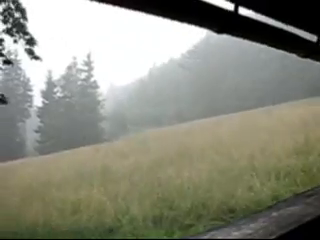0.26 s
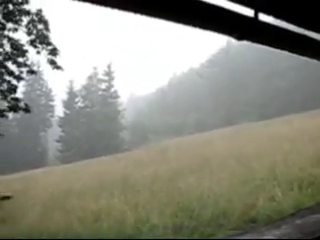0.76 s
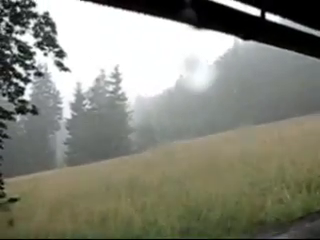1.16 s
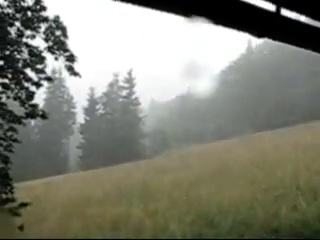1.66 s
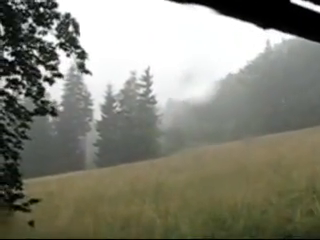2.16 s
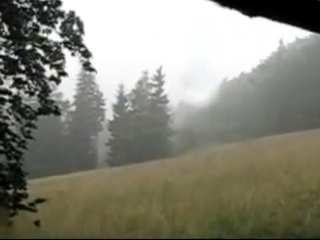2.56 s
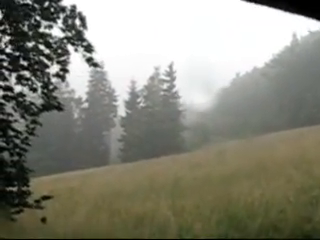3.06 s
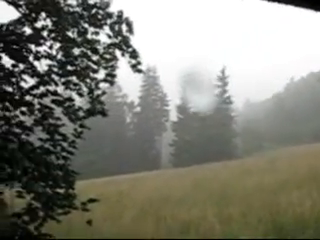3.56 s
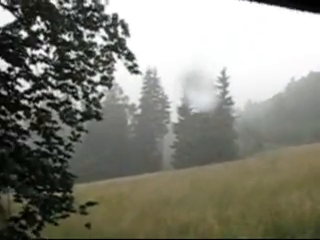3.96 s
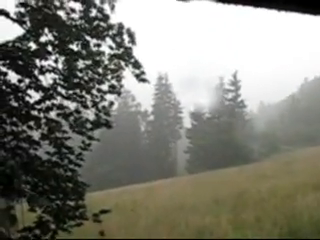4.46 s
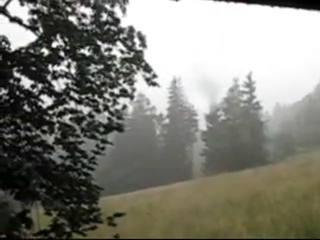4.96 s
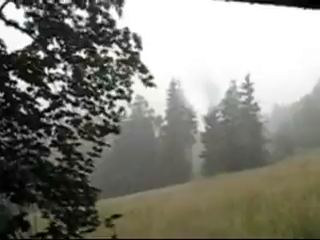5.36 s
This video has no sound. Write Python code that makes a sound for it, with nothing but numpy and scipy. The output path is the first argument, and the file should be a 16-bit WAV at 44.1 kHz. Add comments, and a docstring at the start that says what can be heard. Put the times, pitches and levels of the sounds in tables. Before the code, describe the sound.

Under the eaves in a downpour: a constant broad rain roar, close pattering, soft plops and occasional crisp clicking splashes.

```python
"""Heavy rain on a meadow and on the roof of a wooden shelter, heard from under the eaves.
Countless far drops merge into a roar, made of noise bands that swell together and flicker alone.
Nearer drops patter as short ringing tones; close ones click, chirp and spray, or plop into puddles.
The rain is centred except in the upper mids; its top ends sharply and a faint wide hiss lies above."""
import sys
import numpy as np
from scipy import signal
from scipy.fft import rfft, irfft
from scipy.io import wavfile
from scipy.ndimage import uniform_filter1d

SR = 44100
rng = np.random.default_rng(int(sys.argv[2]) if len(sys.argv) > 2 else 0)


def output_pcm(signal):
    """Save a mono or channel-first signal as 16-bit PCM at the path in sys.argv[1].

    Samples are clipped to [-1, 1] before scaling.
    """
    pcm = np.clip(np.atleast_2d(signal).T, -1, 1) * 32767
    wavfile.write(sys.argv[1], SR, np.round(pcm).astype(np.int16))


N = 246959  # length in samples

# tone colour of the centred rain: (f/Hz, relative level per Hz/dB)
RAIN_COLOUR = [(25, -22), (45, -19), (65, -8), (122, -13), (189, -9), (225, -14.5), (324, -4.5),
               (502, -5.5), (1020, -2), (1540, -3), (2200, -5), (2980, -7), (4620, -8.5), (6500, -13.5),
               (8500, -14.5), (9500, 13)]
# the level dips, mostly just after a sharp close drop; a minus sign means a gain:
# (t/s, level loss aimed at/dB, extra treble loss aimed at/dB)
LEVEL_DIPS = [(0.0, 3, 11), (2.57, 4.5, -0.5), (2.712, 4, -1), (2.722, -2.2, 9), (2.762, 1, 28),
              (4.978, 2.5, 0)]
RAIN_TOP_HZ = 8560  # the centred rain ends sharply here


def from_db(db):
    """Turn decibels into a gain."""
    return 10 ** (np.asarray(db) / 20)


def rms_one(x):
    """Scale a sound to an average (rms) strength of 1."""
    return x / np.sqrt(np.mean(x ** 2) + 1e-20)


def at_hz(points, hz):
    """Read a tone colour between its points, along a logarithmic pitch axis."""
    points = np.array(points)
    return np.interp(np.log(hz), np.log(points[:, 0]), points[:, 1])


def drift(rate_hz):
    """Slow chance wandering with spread 1: coarse noise smoothed twice by a one-pole low-pass."""
    step = 40  # samples between coarse noise values
    r = np.exp(-2 * np.pi * rate_hz * step / SR)
    noise = rng.standard_normal(N // step + 2002)
    slow = signal.lfilter([1], [1, -2 * r, r * r], noise)[2000:]  # skip the filter's start
    return np.interp(np.arange(N) / step, np.arange(len(slow)), rms_one(slow - slow.mean()))


def bandpass(x, low_hz, high_hz, order):
    """Keep the part of a sound between two frequencies."""
    return signal.sosfilt(signal.butter(order, [low_hz, high_hz], "band", fs=SR, output="sos"), x)


def steep(x, hz, kind):
    """Cut a sound off with a very sharp filter edge."""
    return signal.sosfilt(signal.ellip(12, .3, 70, hz, kind, fs=SR, output="sos"), x)


def ring(clicks, hz, t60):
    """Each unit click starts a sine of about height 1 that fades by 60 dB in t60 seconds."""
    r = from_db(-60 / (t60 * SR))
    w = 2 * np.pi * hz / SR
    return signal.lfilter([0, np.sin(w)], [1, -2 * r * np.cos(w), r * r], clicks + 1e-18)


def hiss():
    """Faint hiss above the rain: separate noise in each channel, plus a thin noise band near the top."""
    # colour of the broad hiss: (f/Hz, relative level per Hz/dB)
    hiss_colour = [(7000, -64), (8500, -13), (9800, 4), (11000, 6), (16000, 6.5)]
    broad_db, thin_db = -46, -52
    thin_hz, thin_width_hz = 15630, 230
    white = rng.standard_normal((2, 2, N))
    hz = np.maximum(np.arange(N // 2 + 1) * SR / N, 1)
    broad = irfft(rfft(white[0]) * from_db(at_hz(hiss_colour, hz)), N)
    thin = bandpass(white[1], thin_hz - thin_width_hz / 2, thin_hz + thin_width_hz / 2, 4)
    both = from_db(broad_db) * rms_one(broad) + from_db(thin_db) * rms_one(thin)
    return both * from_db([[-.4], [.4]])  # slightly louder on the right


def plops():
    """Fat eaves drops plop into puddles: a trapped bubble's tone swells softly, roughened by spray."""
    # (t/s, height of the tone's swell/dB, f/Hz)
    puddle_drops = [(0.445, -18.5, 1078), (0.926, -27, 2030), (1.068, -21, 737), (1.3, -26, 960),
                    (1.6, -22, 1670), (1.66, -21, 1615), (1.668, -23, 1056), (1.724, -24, 1950),
                    (1.765, -23, 1335), (1.845, -25, 1270), (2.135, -22, 1564), (2.141, -23.5, 1960),
                    (2.277, -21, 1936), (2.042, -28, 1125), (2.13, -23, 1260), (2.29, -20.5, 1487),
                    (2.368, -25, 1500), (2.412, -21, 2260), (2.912, -33, 2880), (3.176, -18.5, 1000),
                    (3.265, -21, 1470), (3.363, -19, 1630), (3.608, -20, 1273), (3.698, -20.5, 1505),
                    (3.711, -23.5, 2710), (3.76, -20, 1530), (3.96, -20, 1504), (4.279, -23, 1360),
                    (4.507, -21, 1690), (4.607, -18.5, 1410), (4.769, -23, 1340), (5.412, -22, 996)]
    swell_s = 0.0073  # time to the loudest point
    out, t = np.zeros(N), np.arange(2048) / SR
    shape = t / swell_s * np.exp(1 - t / swell_s)
    spray = rng.standard_normal((len(puddle_drops), len(t)))
    for (s, peak_db, hz), noise in zip(puddle_drops, spray):
        wet = rms_one(ring(noise, hz, 0.0069))
        at = round(s * SR)
        out[at:at + len(t)] += from_db(peak_db) * shape * (np.sin(2 * np.pi * hz * t) + 0.5 * wet)
    return out


def splashes():
    """Each close drop clicks, chirps upward and bursts into spray in a band set by what it hits."""
    # (t/s, peak before the final filters/dB, low edge f/Hz, high edge f/Hz, length/s)
    close_drops = [(0.287, -12, 3600, 5000, 0.0049), (0.353, -14, 4170, 5170, 0.0041),
                   (1.564, -15, 6500, 8500, 0.0044), (1.583, -15.5, 6960, 8500, .004),
                   (1.726, -15, 5060, 8700, 0.011), (1.922, -13, 4200, 5400, 0.0082),
                   (1.943, -15, 5700, 6800, 0.0039), (2.563, -23, 8260, 8900, 0.0045),
                   (2.6612, -11, 4300, 5650, .003), (2.7074, -5.5, 3900, 8700, 0.0032),
                   (2.756, -25, 6450, 8800, 0.0046), (4.076, -16, 6500, 8600, 0.0042),
                   (4.245, -14, 4200, 5400, 0.0037), (4.883, -14, 3780, 5200, 0.004),
                   (4.9707, -6, 4300, 7800, 0.0032), (5.128, -16, 6370, 8400, 0.0052)]
    click_share, chirp_share = 0.7, 1.2  # compared with the spray
    out, t = np.zeros(N), np.arange(1024) / SR
    spray = rng.standard_normal((len(close_drops), len(t)))
    for (s, peak_db, low_hz, high_hz, length), noise in zip(close_drops, spray):
        shape = t / length * np.exp(-4 * t / length)
        click = t == t[round(length * SR / 4)]  # at the loudest point of the shape
        rise = np.minimum(1.47 * t / length, 1) ** 2
        chirp = np.sin(2 * np.pi * np.cumsum(low_hz + (high_hz - low_hz) * rise) / SR)
        drop = click_share * click + shape * (np.sign(noise) + chirp_share * chirp)
        burst = bandpass(drop, low_hz, high_hz, 2)
        at = round(s * SR)
        out[at:at + len(t)] += from_db(peak_db) * burst / np.abs(burst).max()
    return out


def patter(bright_db):
    """Nearer drops of uneven size; each rings for a moment on a leaf, blade or board."""
    usual_drops_per_s = 900
    sizes = from_db(1.56 * np.minimum(rng.exponential(1, N), 5)) * rng.choice([-1, 1], N)
    landed = rng.random(N) < usual_drops_per_s * from_db(3 * drift(6.0)) / SR
    pitches = np.geomspace(700, 7500, 16)
    dealt = rng.integers(0, 16, N)  # which pitch a drop gets
    out = 0
    for k, hz in enumerate(pitches):
        colour_db = at_hz(RAIN_COLOUR, hz) + (hz / RAIN_TOP_HZ) ** 0.74 * bright_db
        tones = ring(sizes * landed * (dealt == k), hz, 21.3 / hz)  # higher rings are shorter
        out = out + from_db(colour_db) * hz * tones
    return rms_one(out)


def dips(lost_db, recovers_s):
    """Decibels lost over time: each dip sets in within milliseconds and fades out exponentially."""
    fall_s = 0.0073
    since = np.maximum(np.arange(N) / SR - np.array(LEVEL_DIPS)[:, :1], 0)
    return lost_db @ ((1 - np.exp(-since / fall_s)) * np.exp(-since / recovers_s))


def wide_band(dip_db, gust_db):
    """Rain that differs left to right, made of noise bands; below a wandering lower edge the bands come and go
    in patches."""
    # colour of this rain: (f/Hz, relative level per Hz/dB)
    wide_colour = [(430, -10), (800, -18), (1100, 0), (1500, -2), (2100, 2), (2600, 1.5), (3200, -0.5)]
    wide_db, top_hz = -6, 3190
    edge_hz, ragged_octaves = 1054, 0.3  # lower edge and how far chance moves it
    edge_rise_octaves = 0.12  # per dB of dip
    out, white = 0, rng.standard_normal((2, N))
    edges = 420 * 2 ** np.arange(0, 3.1, 1 / 4)  # quarter octaves
    wander = drift(5.2)  # shared by all bands
    for k, (low, high) in enumerate(zip(edges, edges[1:])):
        band = bandpass(white[k % 2], low, high, 4)
        hz = np.sqrt(low * high)
        above = np.log2(hz / edge_hz) - edge_rise_octaves * dip_db
        reach = above / ragged_octaves + 0.3 * wander + drift(8.1)
        opening = 1 / (1 + np.exp(-6 * reach))  # 0 is silent, 1 is fully heard
        out = out + band * from_db(at_hz(wide_colour, hz) + gust_db) * opening
    return steep(from_db(wide_db) * rms_one(out), top_hz, "low")


def roar(spectrum, bright_db, deep_db, gust_db, flicker_db):
    """Far drops too dense to count: noise bands that swell together and flicker alone."""
    # the deepest rumble stops for a moment: (middle t/s, length/s, upper limit f/Hz)
    rumble_breaks = [(0.768, 0.066, 149), (1.262, 0.042, 100), (2.1, .08, 90), (2.623, 0.058, 150),
                     (3.008, 0.11, 149), (3.23, 0.088, 130), (4.3, .08, 110), (4.657, 0.08, 130),
                     (5.04, .08, 110), (5.426, .1, 130)]
    break_db = 20
    gap_db, gap_hz = 56, 130  # the rumble also breaks off in patches: greatest loss, reach in pitch
    dulled_flicker_share = 0.78  # treble bands flicker more while dulled or brightened
    treble_ceiling_db = 2.5  # highest lift from brightness and flicker
    fine_from_hz = 4000  # bands are narrower from here up
    out, white = 0, rng.standard_normal((2, N))
    lull = drift(4.7)  # shared by all the rumble
    coarse_edges = np.geomspace(25, fine_from_hz, 22)
    edges = np.r_[coarse_edges, np.geomspace(fine_from_hz, 8800, 11)[1:]]
    middle_s, length_s, top_hz = np.transpose(rumble_breaks)
    from_middle = np.arange(0, N, 64) / SR - middle_s[:, None]  # worked out every 64 samples
    broken = np.exp(-(2 * from_middle / length_s[:, None]) ** 4)
    for k, (low, high) in enumerate(zip(edges, edges[1:])):
        band = bandpass(white[k % 2], low, high, 3)
        hz = np.sqrt(low * high)
        treble = (hz / RAIN_TOP_HZ) ** 5.3  # the dulling is strongest near the top
        bass = 1 / (1 + (hz / 400) ** 2)  # drumming on the roof swells on its own
        colour_db = at_hz(spectrum, hz) + bass * deep_db
        if hz < 300:
            gap = np.clip(0.54 * lull + 0.78 * drift(3.1) - hz / gap_hz + 0.1, 0, 1)
            stop = np.repeat(1 / (1 + (hz / top_hz) ** 6) @ broken, 64)[:N]
            colour_db = colour_db - gap_db * gap - break_db * stop
        uneven_db = flicker_db + dulled_flicker_share * min(treble, 1) ** 0.89 * np.abs(bright_db)
        swing_db = np.minimum(treble * bright_db + uneven_db * drift(7.2), treble_ceiling_db)
        out = out + band * from_db(colour_db + gust_db + swing_db)
    # bring the middle value of the short-term power to 1
    return out / np.sqrt(np.median(uniform_filter1d(out ** 2, size=4096)))


def scene():
    """Add up the centred rain, the wide band, the close drops and the hiss."""
    # slow swell of the shower: (t/s, level/dB, treble lift near the top/dB, rumble lift/dB)
    shower = [(0.0, -19.5, 9, -0.5), (0.4, -19, -2, -1), (0.9, -19.5, -1, -1.5), (1.6, -19.0, -2.5, -1),
              (2.3, -19.5, -2, 1), (2.55, -21.5, -0.5, 2), (2.85, -19, -3, -0.5), (3.1, -19.5, -5, 1),
              (3.4, -20, -0.5, 1.5), (3.8, -19.5, -5.5, -1.5), (4.5, -20, -2, -0.5), (4.9, -19, -2.5, -1),
              (5.6, -19, -0.5, -2.5)]
    level_recovers_s, treble_recovers_s = 0.22, 0.27
    treble_flicker_db, rumble_wander_db = 0.5, 0.54  # chance swings of the two ends of the roar
    rumble_dip_share = 0.23  # the deepest rumble follows this share of a dip
    patter_db = -9.5  # against the shower's level
    drops_from_hz = 450  # the single drops sound only above this pitch
    right_lean, lean_hz, lean_octaves = .2, 2200, .42  # strength, middle and reach of the lean
    t = np.arange(N) / SR
    s, level_db, treble_db, rumble_db = np.transpose(shower)
    _, level_lost_db, treble_lost_db = np.transpose(LEVEL_DIPS)
    dip_db = dips(level_lost_db, level_recovers_s)
    level = from_db(np.interp(t, s, level_db) - dip_db)
    bright_db = np.interp(t, s, treble_db) - dips(treble_lost_db, treble_recovers_s)
    bright_db = bright_db + treble_flicker_db * drift(8.4)
    # give the rumble back most of what the dip takes from the overall level
    deep_db = np.interp(t, s, rumble_db) + (1 - rumble_dip_share) * dip_db
    deep_db = deep_db + rumble_wander_db * drift(3.4)
    gust_db = 0.54 * drift(4.1) + 0.37 * drift(9.4)  # sheets of rain swell all bands at once
    drops = level * from_db(patter_db) * patter(bright_db) + splashes() + plops()
    near = steep(drops, drops_from_hz, "high")
    far = roar(RAIN_COLOUR, bright_db, deep_db, gust_db, flicker_db=0.7)
    wide = wide_band(dip_db, gust_db)
    centre = steep(level * far + near, RAIN_TOP_HZ, "low")
    # the upper mids are a little louder on the right
    octaves = np.log2(np.maximum(np.arange(N // 2 + 1) * SR / N, 1) / lean_hz)
    upper_mids = irfft(rfft(centre) * np.exp(-(octaves / lean_octaves) ** 4), N)
    side = level * wide - right_lean * upper_mids  # added on the left, subtracted on the right
    return centre + side * [[1], [-1]] + hiss()


def record(dry):
    """The small microphone loses the deepest bass; the top is cut sharply."""
    thin = signal.sosfilt(signal.butter(2, 36, "high", fs=SR, output="sos"), dry)
    return steep(thin, 15780, "low")


dry = scene()
out = record(dry)
output_pcm(out)
```